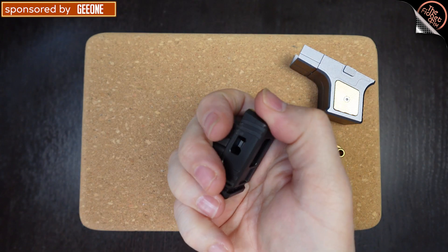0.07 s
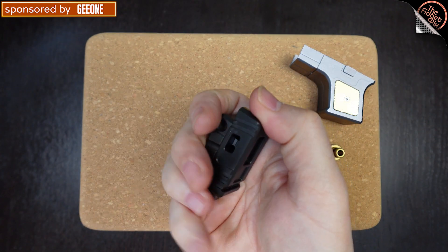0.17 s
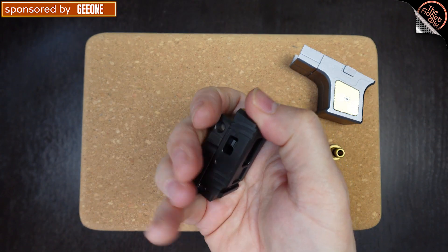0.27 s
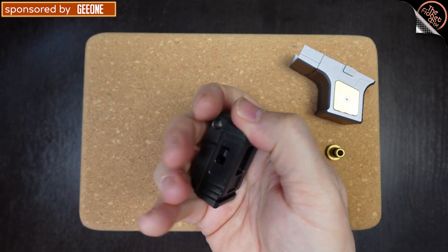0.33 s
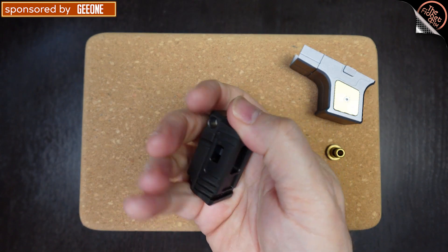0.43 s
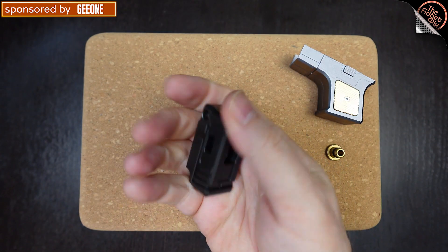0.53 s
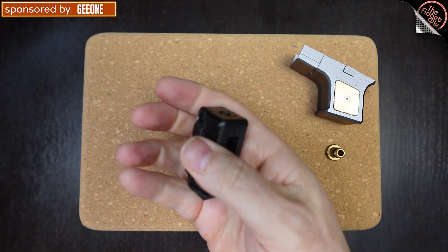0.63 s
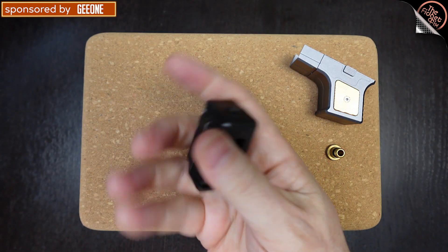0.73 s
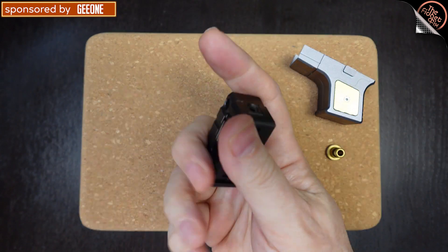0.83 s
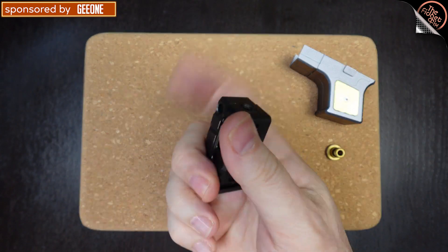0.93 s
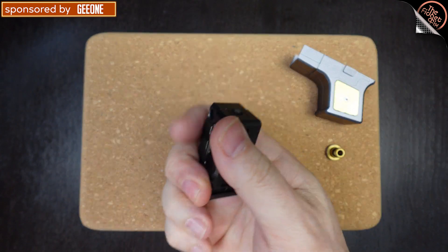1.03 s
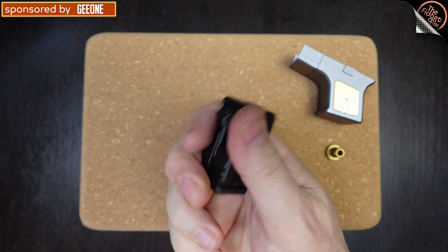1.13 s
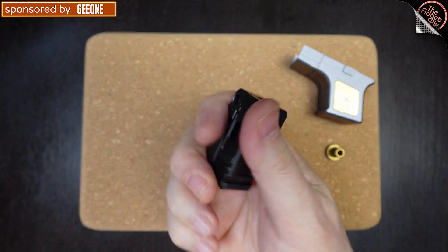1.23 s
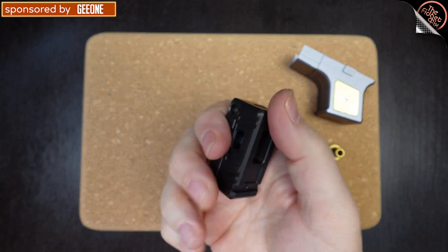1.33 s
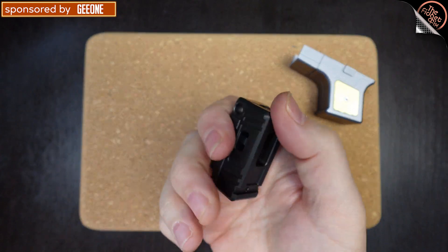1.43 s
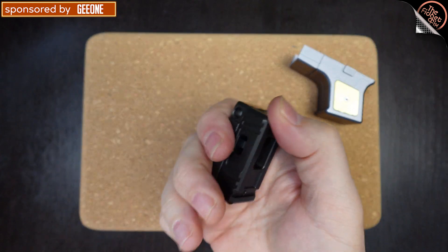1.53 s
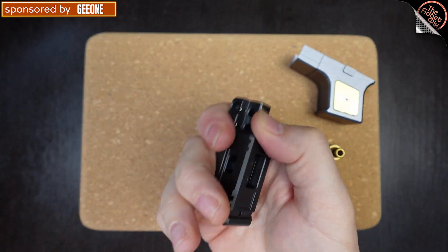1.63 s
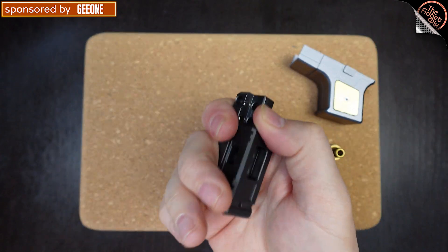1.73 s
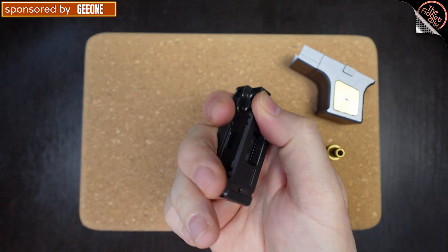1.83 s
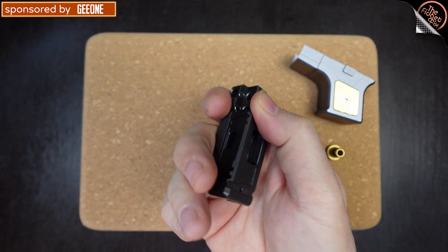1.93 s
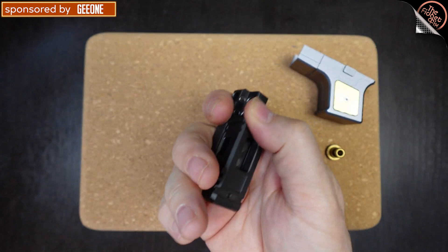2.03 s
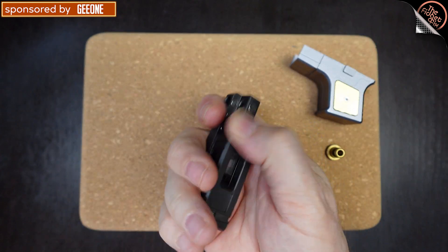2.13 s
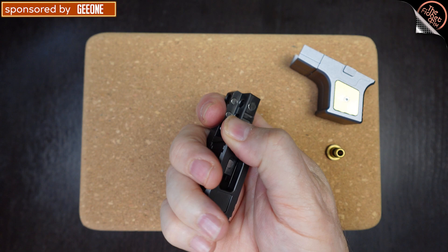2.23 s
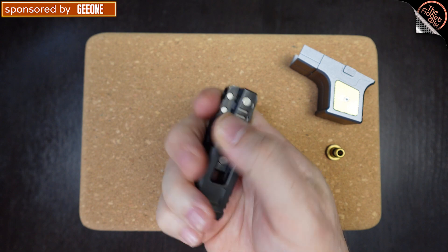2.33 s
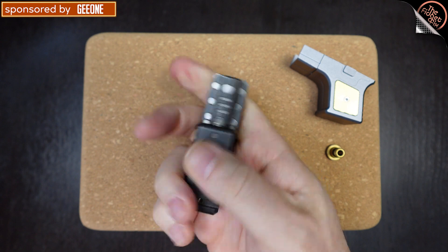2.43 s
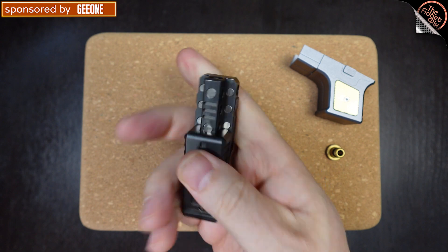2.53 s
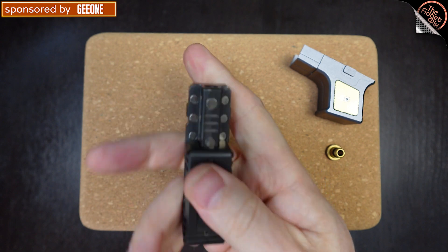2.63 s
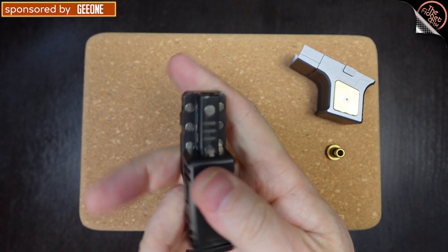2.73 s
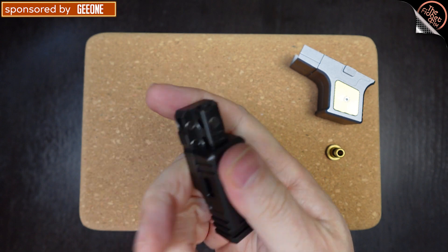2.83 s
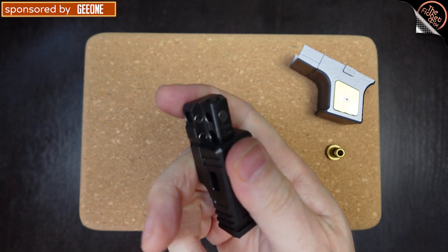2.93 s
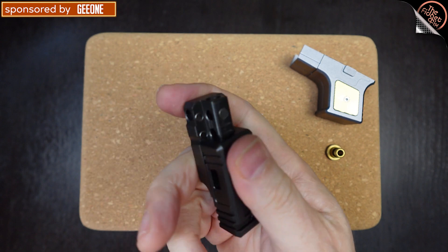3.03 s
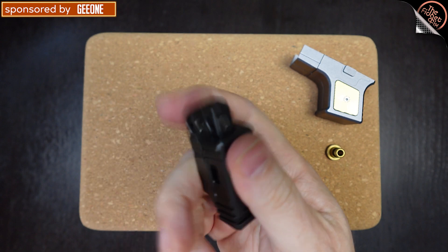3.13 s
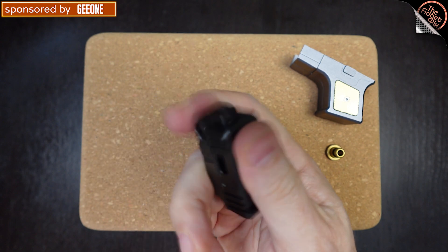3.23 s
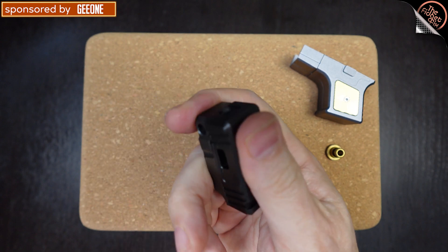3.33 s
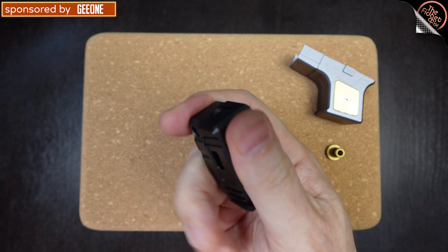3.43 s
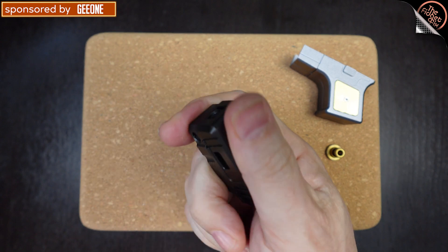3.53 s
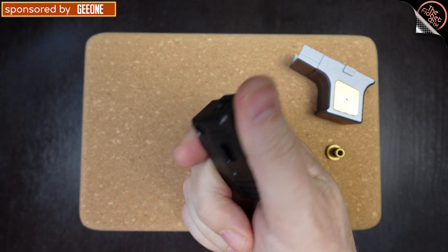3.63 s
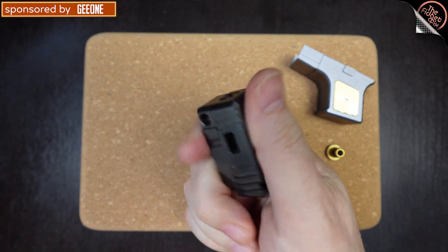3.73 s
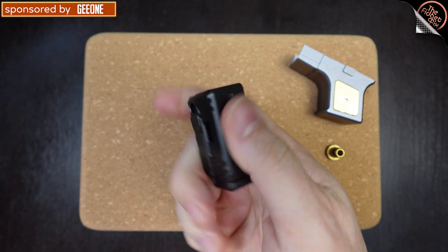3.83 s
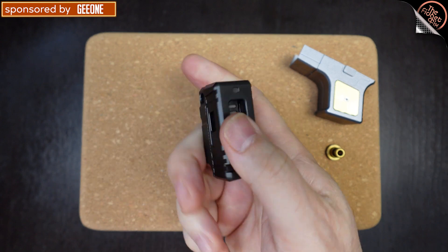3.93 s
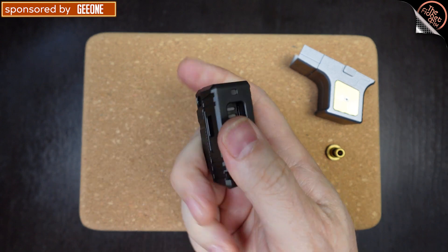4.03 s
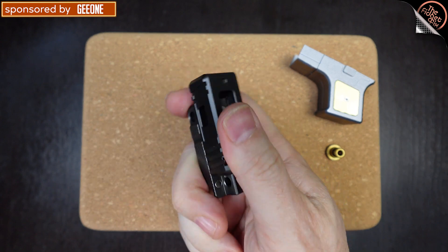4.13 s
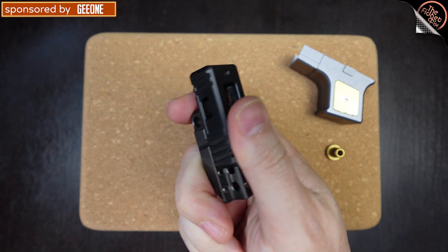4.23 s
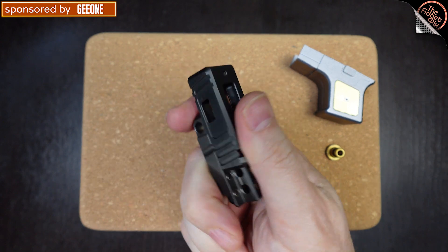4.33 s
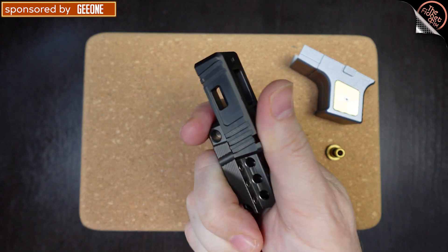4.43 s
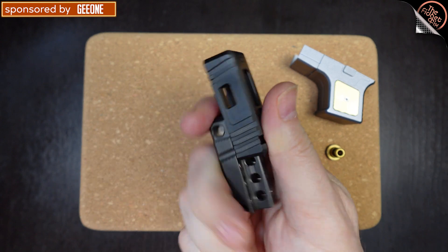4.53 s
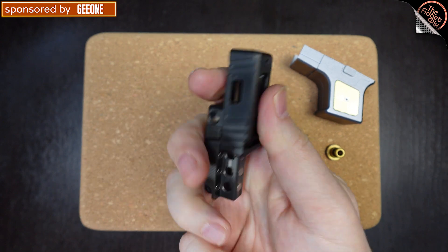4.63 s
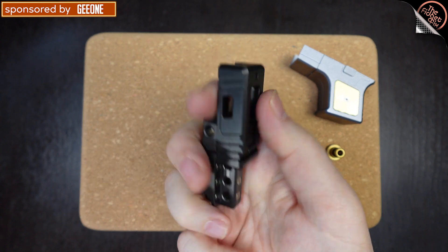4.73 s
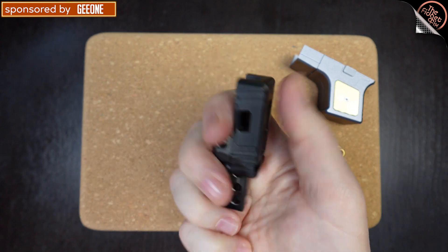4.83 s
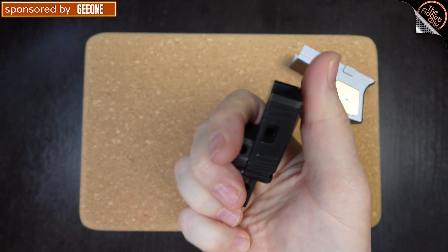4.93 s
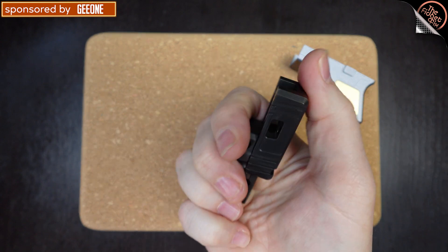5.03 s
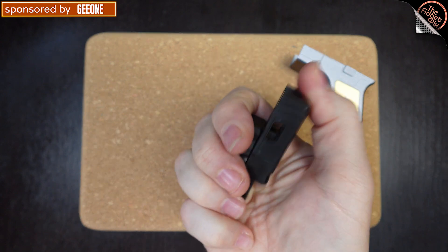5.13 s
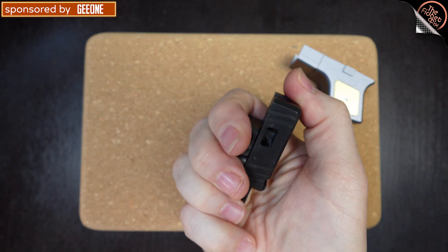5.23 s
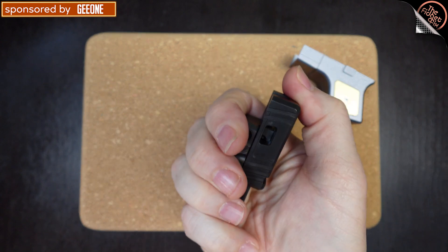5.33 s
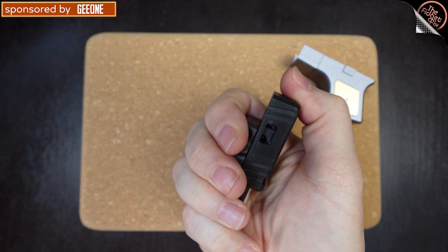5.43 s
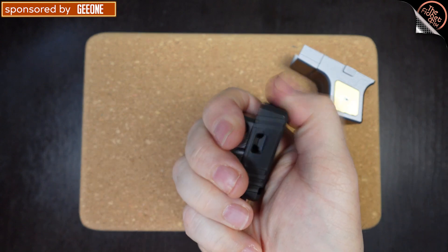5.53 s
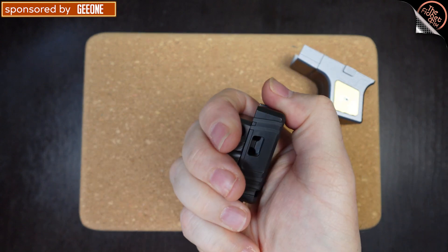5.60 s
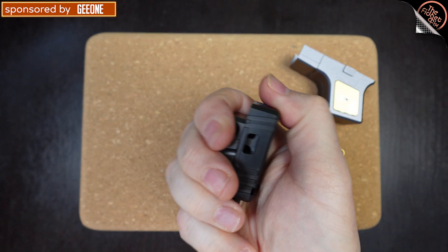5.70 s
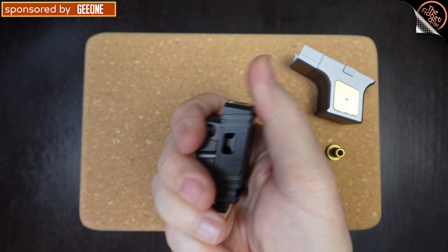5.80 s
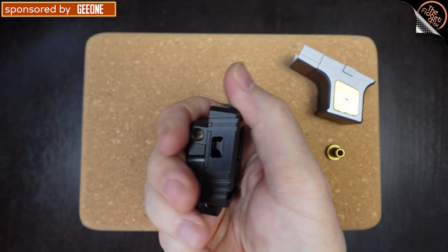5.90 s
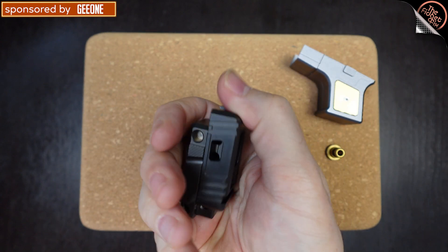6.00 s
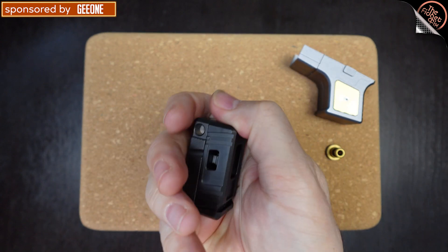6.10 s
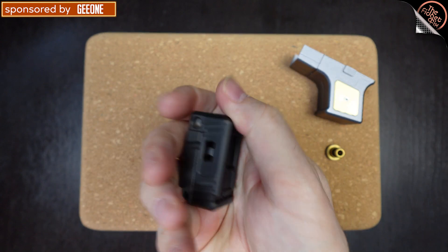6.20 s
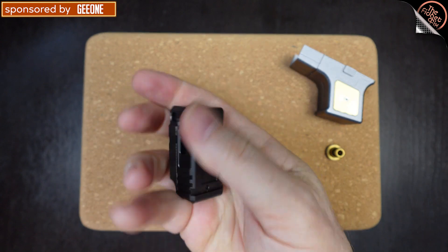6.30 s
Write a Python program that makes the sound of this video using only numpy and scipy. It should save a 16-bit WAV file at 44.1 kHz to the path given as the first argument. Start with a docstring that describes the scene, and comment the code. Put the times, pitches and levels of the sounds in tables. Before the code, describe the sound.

A small steel slider is handled close to the microphone in a small room, over steady low ventilation rumble, thin hiss and a faint wavering fan and mains hum. A loud sharp clack at 0.04 seconds, with metallic jingle, is answered by another at 0.36. After a quiet gap, light catches lead into a softer click at 1.7, and a dull double tick follows at 2.2, with a barely audible tick at 2.5. A strong snap lands at 2.9, then weaker ones at 3.2 and 3.3. A cluster follows at 4.17, 4.27 and 4.41, the middle one loudest, the last longer, hollow and roomier. A loud jingling clack comes at 5.2, a moderate one at 5.6, and a bright, ringing snap at 6.1. Each contact is a tiny burst of rebounds, preceded by a very faint rising scrape and followed by a short diffuse room tail.

```python
"""Magnetic fidget slider in a small room.

A metal slider is worked in one hand, close to the microphone. Magnets pull the slide home with a
swelling scrape of filtered noise, then snap it on its stops; it also catches lightly on its way.
Each contact is a burst of tiny rebounds filtered by shell, steel and grip, answered by a noise-built room.
Behind: ventilation and hiss (shaped noise), fan drone and mains hum (wavering sines)."""
import sys
import numpy as np
from scipy import signal
from scipy.fft import rfft, irfft, next_fast_len
from scipy.io import wavfile
from scipy.ndimage import uniform_filter1d, map_coordinates

SR = 44100
rng = np.random.default_rng(int(sys.argv[2]) if len(sys.argv) > 2 else 0)


def waveform_to_disk(signal):
    """Save audio, clipped to [-1, 1], as 16-bit WAV at the path in sys.argv[1]."""
    frames = np.transpose(np.atleast_2d(signal))
    scaled = np.clip(frames, -1, 1) * 32767
    samples = np.round(scaled).astype(np.int16)
    wavfile.write(sys.argv[1], SR, samples)


N = 280476  # samples


def amp(db):
    """Decibels to gain."""
    return 10 ** (np.asarray(db) / 20)


def unit(x):
    """Scale to rms 1."""
    return x / np.sqrt(np.mean(x ** 2) + 1e-20)


def along(points, hz):
    """Interpolate (Hz, value) points on a log frequency axis."""
    f, v = np.transpose(points)
    return np.interp(np.log(hz + 1), np.log(f + 1), v)


def bell(hz, centre_hz, width_hz):
    """Shape of one resonance, 1 at its centre."""
    return 1 / (1 + (2 * (hz - centre_hz) / width_hz) ** 2)


def wobble(knots_per_s):
    """Smooth random curve through normally distributed knots."""
    knots = rng.standard_normal(int(N * knots_per_s / SR) + 4)
    return map_coordinates(knots, [np.arange(N) * knots_per_s / SR])


def filtered(x, response):
    """Apply a response given as a function of frequency."""
    size = next_fast_len(N + SR // 2)
    hz = np.fft.rfftfreq(size, 1 / SR)
    return irfft(rfft(x, size) * response(hz), size)[:N]


def causal(gain):
    """Minimum-phase response with these gains: it rings only after the blow."""
    cepstrum = irfft(np.log(np.maximum(gain, 1e-6)))
    half = len(cepstrum) // 2
    cepstrum[1:half] *= 2
    cepstrum[half + 1:] = 0
    return np.exp(rfft(cepstrum))


def add(track, time_s, sound):
    """Mix a sound into the track."""
    start = max(round(time_s * SR), 0)
    track[start:start + len(sound)] += sound[:len(track) - start]


# ventilation and hiss spectrum: (frequency [Hz], relative density [dB])
AIR_SPECTRUM = [(18, -7), (32, -6.5), (55, -4.5), (85, -2), (130, -5.5), (200, -10), (320, -15.5),
                (550, -19), (1350, -25.5), (3900, -31), (9000, -32.5), (15800, -33.5)]
# fan and mains tones: (frequency [Hz], rms level [dB], wander [Hz], sway [dB]); wander and sway are std at knots
HUM_TONES = [(42.7, -58, 3.127, 0), (120.6, -61, 0.41, 1), (295, -77, 0.886, 1.5)]
AIR_RMS_DB = -55


def background():
    """Broadband air noise plus tones whose pitch and level drift at random."""
    noise = rng.standard_normal(N)
    air = unit(filtered(noise, lambda hz: amp(along(AIR_SPECTRUM, hz))))
    hum = np.zeros(N)
    for hz, db, wander_hz, sway_db in HUM_TONES:
        phase = 2 * np.pi * np.cumsum(hz + wander_hz * wobble(9)) / SR
        tone = amp(sway_db * wobble(5.2)) * np.sin(phase)
        hum += amp(db) * unit(tone)
    return amp(AIR_RMS_DB) * air + hum


# wall decay: (frequency [Hz], t60 [s])
ROOM_DECAY = [(800, 0.3), (2500, 0.35), (4500, 0.4023), (6500, 0.41), (9500, 0.24), (14000, 0.33)]


def room(x, build_up_s=0.0047):
    """Diffuse wall answer: swelling noise with a decay per frequency, at the energy of x."""
    hz, t_s, noise = signal.stft(rng.standard_normal(SR // 2), SR, nperseg=256)
    swell = 1 - np.exp(-(t_s / build_up_s) ** 2)
    decay = amp(-60 * t_s / along(ROOM_DECAY, hz)[:, None])
    tail = signal.istft(noise * swell * decay, SR, nperseg=256)[1]
    wet = signal.fftconvolve(x, tail)
    return wet * np.linalg.norm(x) / np.linalg.norm(wet)


# snaps on a stop: (time [s], level [dB], half chatter length [s],
#   hollow of hand and shell [Hz], hollow gain [dB], low shell mode [Hz], high shell mode [Hz],
#   shell mode gain [dB], steel ring [scale], steel jingle [scale])
STOP_SNAPS = [(0.0375, -25.5, 0.005, 4000, 7.5, 2050, 3220, 8, 1.07, 1.5),
              (0.3584, -25, 0.0064, 3630, 7, 4200, 5960, 13, 0.63, .3),
              (1.6987, -33.5, .0075, 3970, 7, 4700, 5000, 2, 1.08, 0.96),
              (2.1959, -39.5, .007, 4470, 18, 5100, 6280, 8, 0.86, .5),
              (2.8875, -26.5, 0.0084, 4000, 15, 6220, 6350, 12, 0.38, 0.33),
              (3.2039, -33, 0.0075, 3450, 5, 3800, 6100, 12, 0.81, 0.3),
              (3.2928, -39.5, 0.0053, 5970, 13, 3220, 3890, 18, 1.2, 1.4),
              (4.167, -37.5, 0.0076, 4520, 8, 5100, 6030, 5.5, 0.84, .35),
              (4.2665, -28.5, .0057, 4350, 13, 4630, 5800, 10, 1.13, .3),
              (4.4082, -35.5, 0.013, 4020, 21, 3770, 5040, 7, 0.94, .5),
              (5.2188, -26, 0.0062, 2900, 16, 4460, 4630, 8, .9, 2.04),
              (5.5769, -31.5, 0.01, 3070, 10.5, 2700, 5900, 7.5, 1.06, 1.06),
              (6.0962, -25.5, 0.0058, 5830, 12.5, 2830, 4120, 10.5, 1.1, 1.5)]
SCRAPE_S, SCRAPE_DB = .02, -29.5  # duration; level re the snap


def slide(width_hz=2000, peak_db=26, rise_db=10, room_db=-3):
    """Friction noise through the hollow, rising up to each snap as the magnets pull the slide home."""
    track = np.zeros(N + SR)
    for time_s, db, _, hollow_hz, *_ in STOP_SNAPS:
        rail = lambda hz: amp(peak_db * bell(hz, hollow_hz, width_hz)) * hz / np.hypot(hz, 1500)
        friction = filtered(rng.standard_normal(N), rail)[:int(SCRAPE_S * SR) + 1]
        rise = amp(rise_db * np.linspace(-1, 0, len(friction)))
        scrape = amp(db + SCRAPE_DB) * unit(friction * rise)
        add(track, time_s - SCRAPE_S, scrape)
        add(track, time_s - SCRAPE_S, amp(room_db) * room(scrape))
    return track[:N]


# light catches of the slide on its way: (time [s], level [dB])
LIGHT_CATCHES = [(0.3423, -51), (1.683, -38), (1.694, -39), (2.207, -39), (2.54, -59), (6.092, -49)]
# room re direct sound, higher while the slider is turned away: (time [s], level before the trim in snaps() [dB])
TURNED_AWAY = [(0, -5), (2.9, -3.5), (4.17, -2.2), (4.41, 2), (5.2, -3.5), (6.1, -3)]
CATCH_HALF_S = .0065  # half chatter length


def contacts():
    """Yield (time s, dB, half length s, room dB, grip); a catch takes the nearest snap's grip."""
    turned_db = lambda time_s: np.interp(time_s, *np.transpose(TURNED_AWAY))
    for time_s, db, half_s, *grip in STOP_SNAPS:
        yield time_s, db, half_s, turned_db(time_s), grip
    for time_s, db in LIGHT_CATCHES:
        _, _, _, *grip = min(STOP_SNAPS, key=lambda snap: abs(snap[0] - time_s))
        yield time_s, db, CATCH_HALF_S, turned_db(time_s), grip


def chatter(half_s, size, rise_share=0.42, fade_db=5, settle_db=14, count=110):
    """Spectrum of one contact's tiny random rebounds: they build up, fade slowly, then settle faster."""
    progress = 2 * rng.random(count)  # in half lengths
    when_s = progress * half_s
    build_up = np.minimum((when_s + 1e-4) / (rise_share * half_s + 1e-4), 1)
    loss_db = fade_db * progress + settle_db * np.clip(progress - .8, 0, 1)
    strength = rng.choice([-1, 1], count) * build_up * amp(-loss_db)
    spectrum = rfft(np.bincount((when_s * SR).astype(int), strength), size)
    # even out the chatter's broad colour, leaving colour to shell, steel and grip
    broad_power = np.abs(uniform_filter1d(np.abs(spectrum) ** 2, size=56))
    return spectrum * causal((broad_power + 1e-9) ** -.5)


# radiation of the small body: (frequency [Hz], gain [dB])
SHELL_RADIATION = [(600, -26), (1150, -11), (1600, -11), (1850, -1.5), (2300, -1), (3000, 0.5), (5000, 3),
                   (6500, -1), (7200, -5.5), (10000, -12.5), (13300, -14.5), (14200, -21), (15500, -32)]
# slide modes, three ringing then two jingling: (centre before scatter [Hz], width [Hz], gain before scale [dB])
STEEL_MODES = [(9170, 580, 17.5), (9116, 93, 10), (12980, 650, 16.5), (10740, 990, 5), (11650, 470, 12.5)]
STEEL_SCATTER_HZ = 30  # std of the modes' common shift per contact
HARDNESS_DB_PER_OCTAVE = -.5  # contact tilt


def gripped_body(hz, grip, hollow_width_hz=1400, low_width_hz=400, high_width_hz=520):
    """Response of shell and steel in one grip: broad hollow, two shell modes, steel ringing where free."""
    hollow_hz, hollow_db, low_hz, high_hz, mode_db, ring, jingle = grip
    grip_db = hollow_db * bell(hz, hollow_hz, hollow_width_hz)
    grip_db += mode_db * (bell(hz, low_hz, low_width_hz) + bell(hz, high_hz, high_width_hz))
    shift_hz = STEEL_SCATTER_HZ * rng.standard_normal()
    modes_db = [db * bell(hz, centre_hz + shift_hz, width_hz) for centre_hz, width_hz, db in STEEL_MODES]
    steel_db = ring * sum(modes_db[:3]) + jingle * sum(modes_db[3:])
    tilt_db = HARDNESS_DB_PER_OCTAVE * np.log2(np.maximum(hz, 500) / 4000)  # flat below 500 Hz
    bass_cut = hz / np.hypot(hz, 500)  # so small a body radiates hardly any bass
    return causal(bass_cut * amp(along(SHELL_RADIATION, hz) + grip_db + steel_db + tilt_db))


def snaps(room_trim_db=0.74, spread=0.53, size=4096):
    """Each contact's chatter excites the gripped body, then the room answers."""
    track = np.zeros(N + SR)
    hz = np.fft.rfftfreq(size, 1 / SR)
    for time_s, db, half_s, room_db, grip in contacts():
        body = gripped_body(hz, grip)
        gain = amp(db) * np.sqrt(half_s * SR / size)  # level = energy averaged over half_s
        snap = gain * unit(irfft(body * chatter(half_s, size)))
        add(track, time_s, snap)
        # walls hear all sides of the body: evens out part of the chatter's colour
        all_round = gain * unit(irfft(body))
        wet = amp(room_trim_db + room_db)
        add(track, time_s, wet * np.sqrt(1 - spread) * room(snap))
        add(track, time_s + half_s / 2, wet * np.sqrt(spread) * room(all_round))
    return track[:N]


def scene():
    """Slider in front of the background, mono."""
    return (background() + slide() + snaps())[None]


TOP_HZ = 15950


def record(dry):
    """Band limit: nothing passes from TOP_HZ up."""
    return np.array([filtered(channel, lambda hz: hz < TOP_HZ) for channel in dry])


dry = scene()
out = record(dry)
waveform_to_disk(out)
```